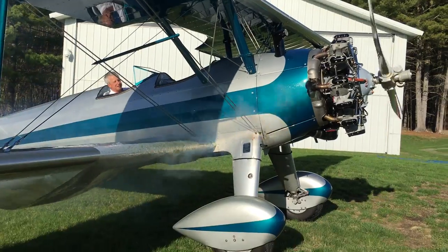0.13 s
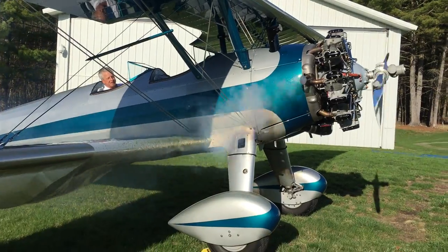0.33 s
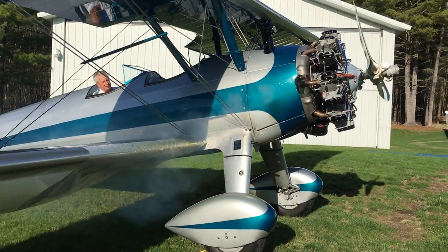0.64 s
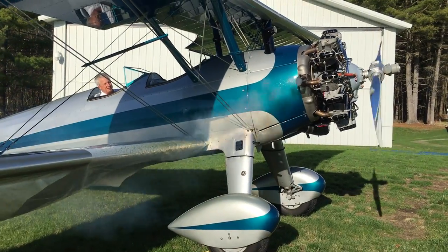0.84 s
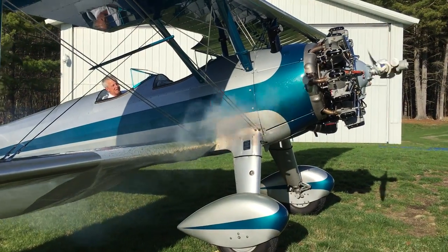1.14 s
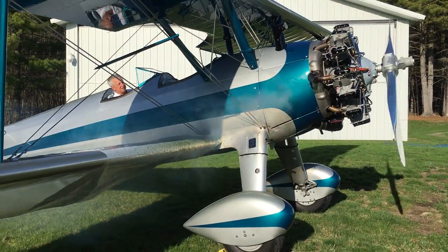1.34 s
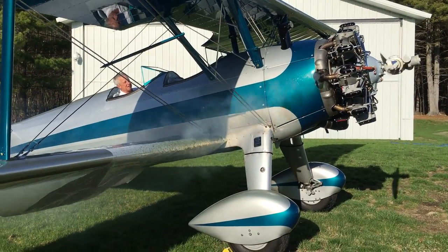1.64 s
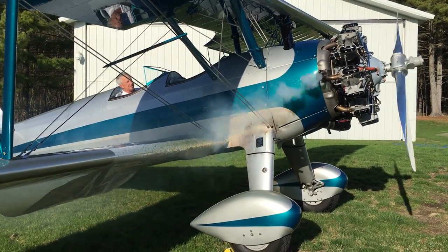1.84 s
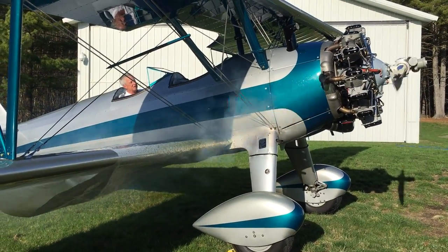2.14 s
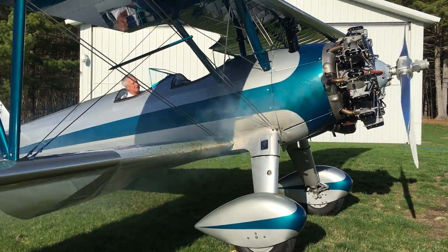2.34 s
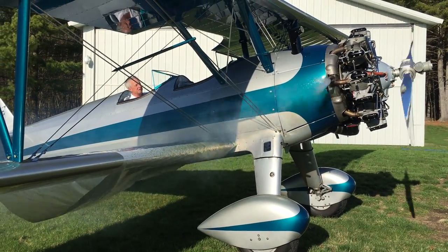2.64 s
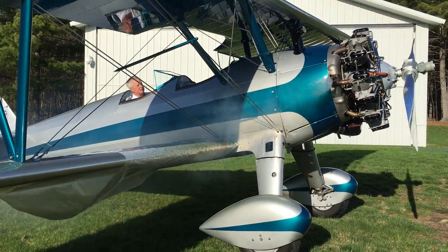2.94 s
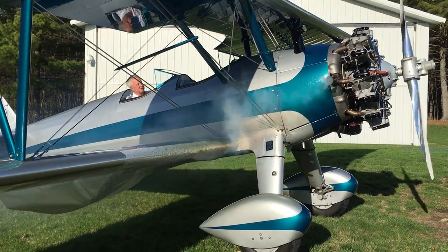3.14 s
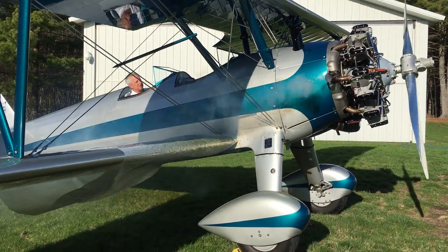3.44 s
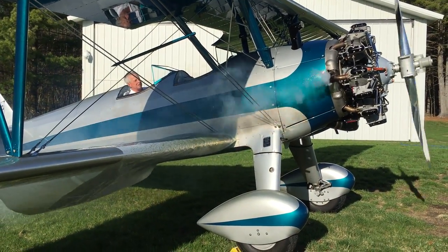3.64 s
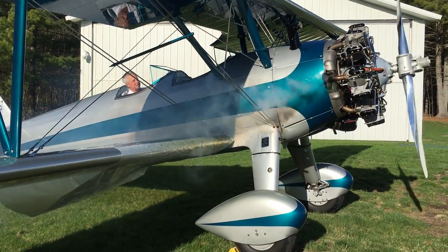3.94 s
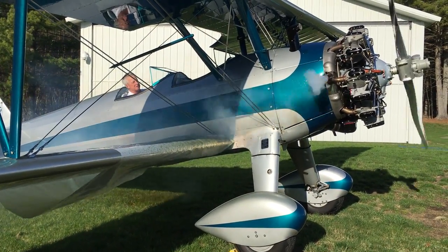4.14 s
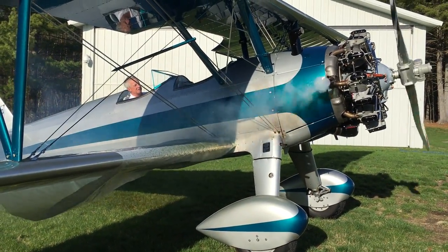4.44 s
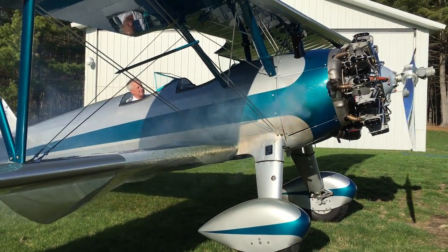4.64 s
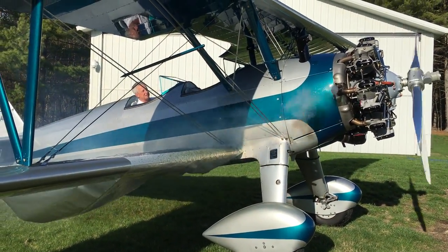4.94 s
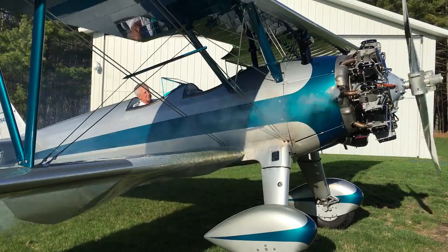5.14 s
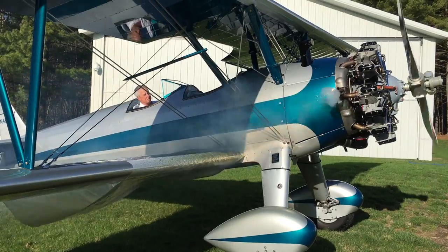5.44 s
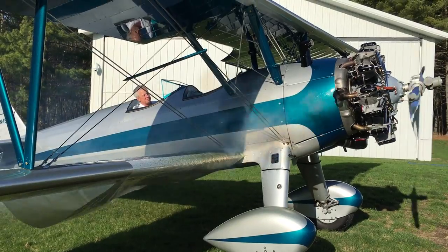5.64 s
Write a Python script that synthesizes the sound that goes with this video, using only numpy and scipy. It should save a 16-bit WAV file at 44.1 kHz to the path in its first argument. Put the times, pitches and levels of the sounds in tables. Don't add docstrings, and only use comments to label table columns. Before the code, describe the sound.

Close, dry outdoor sound of an old multi-cylinder aircraft engine at slow idle. Bursts of bright gas hiss ring briefly in pipe and cowl, backed by low knocks and thuds. The rhythm stumbles, with strong and weak firings and dead strokes, somewhat more regular later. A steady airy propeller wash and fine mechanical ticking fill the gaps, and faint dull echoes follow the loudest spits. The microphone stays put, a few metres off.

```python
import sys
import numpy as np
from scipy import signal
from scipy.fft import rfft, irfft
from scipy.io import wavfile
from scipy.ndimage import uniform_filter1d

SR = 44100
rng = np.random.default_rng(int(sys.argv[2]) if len(sys.argv) > 2 else 0)


def dump(signal):
    limited = np.clip(np.atleast_2d(signal).T, -1, 1)
    pcm = np.round(limited * 32767).astype(np.int16)
    wavfile.write(sys.argv[1], SR, pcm)


def volts_from_decibels(level):
    exponent = np.asarray(level, float) / 20
    return 10 ** exponent


N = 254898
STROKE_N = SR // 8

# frequency in Hz, level in dB per Hz.
WASH_SPECTRUM = [(30, -22), (100, -0.5), (135, -5), (165, -11.5), (195, -0.5), (306, -6), (465, -18),
                 (1500, -15), (3750, -23), (15500, -43.5)]

# engine cycles (two turns, seven strokes), and the moments they begin in seconds.
CYCLE_NUMBERS = [-1, 0, 2, 4, 6, 8, 10, 11, 12, 14, 15, 16, 17, 18, 20, 21, 22, 24]
CYCLE_START_S = [-0.219, 0.0255, 0.517, 1.0155, 1.51, 2.0085, 2.511, 2.7545, 2.9925, 3.4815, 3.731, 3.976,
                 4.2255, 4.466, 4.9325, 5.172, 5.404, 5.878]
VALVE_EARLY_S = [0, .0055, .001, .0015, .001, .0015, .001]
MISFIRE_CYCLES = [
    [2, 6, 16],
    [1, 3, 5, 8, 10, 12, 14, 20],
    [0, 2, 3, 5, 6, 8, 11, 13, 14, 16, 17, 19, 20, 22, 23],
    [],
    [],
    [1, 3, 7, 9, 11],
    [8, 20],
]

# jet, pipe, thump, knock and bark level, all in dB.
FIRED_LEVELS = [(-25.5, -22.5, -24, -21, -31), (-18, -22.5, -20, -16, -20), (-17.5, -19, -15, -23, -24),
                (-28.5, -24, -18, -27, -30), (-21, -20.5, -29, -17, -24.5), (-21.5, -19.5, -21, -18, -23),
                (-23, -21, -16.5, -21, -35)]
# jet, pipe, thump, knock and bark level, all in dB.
PUMPED_LEVELS = [(-37, -38, -40, -30, -33), (-51, -44, -18, -40, -28), (-53, -41, -32, -34, -35),
                 (-50, -42, -30, -40, -34), (-50, -42, -30, -40, -34), (-60, -45, -21, -38, -33),
                 (-53, -41, -24, -43, -36)]
# jet, pipe, thump, knock and bark in dB.
REBOUND_BOOST_DB = [1.5, 1.1, .6, .6, .6]
# time in seconds, jet change in dB, pipe change in dB.
RICH_AND_LEAN = [(.026, 5, .3), (.235, -3.5, -1.1), (.481, -3, -.6), (.549, 1.5, 4), (.871, 4, -2.1),
                 (.978, 4, 1.5), (1.4, 4.5, 3), (1.434, -.6, -6), (1.54, -2.5, -5), (1.898, -2.5, -5),
                 (2.258, -5.5, -5), (2.33, -9, -11), (2.58, -13, -12), (2.65, 2.1, -4.5), (3.097, 3, -6),
                 (3.587, -4, -4), (3.623, 4, 1.1), (4.007, -2.1, -4), (4.079, -6, -1.1), (4.254, -1.1, -5),
                 (4.533, 3, 3.5), (4.599, 1.5, -4), (4.699, -5, -.6), (4.796, -5, -2.5), (5.171, 3, .3),
                 (5.405, -7, .3), (5.501, -3, -1.1), (5.538, -5.5, -9), (5.57, -11, -7.5), (5.604, 4, 4)]
# time in seconds, thump change in dB.
THUMP_CHANGES = [(.026, -14), (.549, -7), (.871, -11), (1.017, 6), (1.364, -11), (1.54, -18), (1.789, 5),
                 (1.827, -5), (1.972, -6), (2.114, -8), (2.291, 5), (2.33, -5), (2.58, -10), (2.616, -18),
                 (2.754, 5), (2.784, 4), (3.097, -9), (3.202, -5), (3.237, 8), (3.267, -6), (3.34, 3),
                 (3.587, -9), (3.799, 3), (4.007, -18), (4.325, 4), (4.564, -9), (4.699, 11), (5.171, 8),
                 (5.405, 10), (5.641, 6)]
# time in seconds, knock change in dB, bark change in dB.
KNOCK_BARK_CHANGES = [(.235, -7, 1.5), (.906, 1.1, -6), (.978, 4, 1.5), (1.083, -5, -2.1),
                      (1.189, -9, -1.1), (1.434, 5, -6), (1.54, 1.1, -4), (1.688, 4.5, 2.5),
                      (1.789, -5, .3), (1.827, 4, 6.5), (1.864, 9, 3), (1.898, -15, -15), (1.972, 5, -4),
                      (2.258, -15, -6), (2.291, -8, 4), (2.33, -15, -2.1), (2.366, 9, 1.1), (2.473, 5, 5),
                      (2.58, -6, -16), (2.888, 1.1, 6), (3.13, 3.5, 3), (3.164, -18, .3), (5.741, .3, -9),
                      (3.409, -18, -6), (3.903, 4.5, 1.1), (4.533, 9, -1.1), (4.665, 7, -2.1),
                      (4.727, -14, .3), (5.538, -18, -5), (5.57, -15, -10)]

# thump delay in seconds, knock delay in seconds, knock in Hz,
# bark delay in seconds, bark in Hz, jet swell in seconds.
CYLINDER_LAYOUT = [(0.0436, -0.0025, 99, .004, 298.4, 0.003), (0.0333, .0231, 106.5, -.003, 301.3, 0.0029),
                   (0.0134, -0.0045, 78.7, -0.0034, 280, .0027), (-0.007, -0.00003, 91, .004, 273, 0.0031),
                   (-0.0225, 0.0186, 96.7, -0.00017, 286.5, 0.0034),
                   (0.024, 0.0089, 99.4, -.005, 324, 0.0029), (-0.0065, 0.0011, 85, .004, 270, 0.0026)]
# frequency in Hz, level in dB per Hz.
JET_SPECTRUM = [(1760, -29), (3000, -12.5), (3800, -4.5), (4910, -7), (6890, -4.5), (9540, -7.5),
                (10400, -11), (14400, -8.5), (15700, -7.5)]
LATE_OUTFLOW = [0.59, 0.28, 0.077, 0.6, 0.25, 0.26, 0.75]
# frequency in Hz, width in Hz, level in dB.
PIPE_MODES = [(698, 30, -9.5), (856, 58, -3.5), (985, 48, -5.5), (1177, 100, -4), (1482, 37, -1.6),
              (1874, 158, 2), (1922, 71, 1), (2156, 68, 0), (2442, 66, -4.5), (3270, 145, -4),
              (3716, 190, 3), (4280, 210, -2.5)]
# jet edge in dB, hoot in dB, then pipe level in dB
CYLINDER_COLOURS = [(-4.5, -9, 0.76, 2.9, -0.7, 0.91), (0, -8, 0.42, 2, 6.5, -1.2),
                    (0.7, -8.5, 0.35, 2.5, 3, 2.7), (-3, -8.5, .1, 3.2, -2.8, 0.25),
                    (-0.5, -10.5, -0.25, -2.2, 3, 1.5), (5.5, -8.5, -1.7, 3, 3, -2),
                    (-5.5, -0.7, 1.8, 2.5, 0.5, -2.4)]
COLOUR_HZ = [930, 1490, 1900, 2250, 3000]


def evened(x):
    return x / np.sqrt(np.mean(x ** 2) + 1e-20)


def coloured(x, points):
    point_hz, point_db = np.transpose(points)
    hz = np.fft.rfftfreq(N, 1 / SR)
    gain_db = np.interp(np.log(hz + 1), np.log(point_hz), point_db)
    return irfft(rfft(x) * volts_from_decibels(gain_db), N)


def bandpassed(x, low_hz, high_hz):
    return signal.sosfilt(signal.butter(2, [low_hz, high_hz], "band", fs=SR, output="sos"), x)


def resonate(x, hz, width_hz):
    carrier = np.exp(2j * np.pi * hz * np.arange(N) / SR)
    decay = np.exp(-np.pi * width_hz / SR)
    smoothed = signal.lfilter([1 - decay], [1, -decay], x / carrier)
    return 2 * (carrier * smoothed).real


def wash():
    rumble_spectrum = [(22, -40), (38, 6), (50, -5.5), (75, -8), (110, -1.0), (145, -5.5), (162, -20), (400, -67)]
    air = evened(coloured(rng.standard_normal(N), WASH_SPECTRUM))
    rumble = evened(coloured(rng.standard_normal(N), rumble_spectrum))
    return volts_from_decibels(-31.5) * air + volts_from_decibels(-28.5) * rumble


def clatter():
    taps_per_s = 150
    strength_db = 5.7 * np.minimum(rng.exponential(1, N), 4)
    taps = volts_from_decibels(strength_db) * (rng.random(N) < taps_per_s / SR)
    heads = sum(resonate(taps, hz, 210) for hz in (1300, 2300, 3900))
    return volts_from_decibels(-45.5) * evened(heads)


def strokes():
    cycle, cylinder = np.divmod(np.arange(-1, 166), len(FIRED_LEVELS))
    even_s = np.interp(cycle + cylinder / len(FIRED_LEVELS), CYCLE_NUMBERS, CYCLE_START_S)
    return even_s - np.take(VALVE_EARLY_S, cylinder), cylinder, cycle


def strengths():
    stroke_s, cylinder, cycle = strokes()
    dead = np.array([c in MISFIRE_CYCLES[k] for k, c in zip(cylinder, cycle)])
    after_dead = np.roll(dead, 1)
    fired_db = np.take(FIRED_LEVELS, cylinder, axis=0) + np.outer(after_dead, REBOUND_BOOST_DB)
    for layers, table in (([0, 1], RICH_AND_LEAN), ([2], THUMP_CHANGES), ([3, 4], KNOCK_BARK_CHANGES)):
        for at_s, *change_db in table:
            nearest = np.argmin(abs(stroke_s - at_s))
            fired_db[nearest, layers] += change_db
    pumped_db = np.take(PUMPED_LEVELS, cylinder, axis=0)
    return np.where(dead[:, None], pumped_db, fired_db).T


def swell(rise_s, sharp=1):
    u = np.arange(STROKE_N) / SR / np.reshape(rise_s, (-1, 1))
    return (u * np.exp(1 - u)) ** sharp


def played(db, delay_s, shapes):
    out = np.zeros(N + SR)
    lead = SR // 10
    starts = np.round((strokes()[0] + delay_s) * SR).astype(int) + lead
    shapes = np.broadcast_to(shapes, (len(starts), shapes.shape[1]))
    for at, gain, shape in zip(starts, volts_from_decibels(db), shapes):
        out[at:at + len(shape)] += gain * shape
    return out[lead:lead + N]


def turbulence(lumps, puffs):
    eddies = evened(uniform_filter1d(rng.standard_normal(N), size=40))
    gusts = evened(uniform_filter1d(uniform_filter1d(rng.standard_normal(N), size=150), size=150))
    return evened(rng.standard_normal(N) * np.exp(lumps * eddies + puffs * gusts))


def jet(db, rise_s, edge_db, late):
    # low edge in Hz, high edge in Hz, slowness of the swell, share of the jet edge level.
    bands = [(1480, 6230, 3.1, 0.078), (5300, 10500, 2.57, 0.63), (9500, 14700, 1.99, 1.27)]
    chance_db = 1.1 * rng.standard_normal((len(db), 3))
    total = 0
    for k, (low_hz, high_hz, slow, tilt) in enumerate(bands):
        hiss = bandpassed(evened(coloured(turbulence(0.23, 0.34), JET_SPECTRUM)), low_hz, high_hz)
        spit = 0.3 * swell(0.0027)
        surge = swell(slow * rise_s, 2.31)
        outflow = late[:, None] * swell(1.79 * slow * rise_s, 4.03)
        band_db = db + 3.0 + tilt * edge_db + chance_db[:, k]
        total = total + hiss * played(band_db, -0.001, spit + surge + outflow)
    return total


def note(db, delay_s, hz, rise_s, glide):
    detune, start, heat = rng.standard_normal((len(db), 3)).T[:, :, None]
    t = np.arange(STROKE_N) / SR
    stroke_hz = np.reshape(hz, (-1, 1)) * (1 + 0.021 * detune)
    turns = stroke_hz * (t + glide * (1 + heat) * t ** 2) + start
    return played(db, delay_s, swell(rise_s, 1.62) * np.sin(2 * np.pi * turns))


def pipe(db, colour_db, hoot_db):
    flow = turbulence(0.24, 0.17)
    shape = swell(0.009, 1.22)
    chance_db = 2.3 * rng.standard_normal((len(db), len(PIPE_MODES)))
    ring = 0
    for k, (hz, width_hz, mode_db) in enumerate(PIPE_MODES):
        own_db = np.array([np.interp(hz, COLOUR_HZ, [*c, 0]) for c in colour_db])
        drive = flow * played(db + mode_db + own_db + chance_db[:, k], 0.00033, shape)
        ring = ring + (-1) ** k * resonate(drive, hz, width_hz) * np.sqrt(1000 / width_hz)
    rough = bandpassed(flow * played(db, 0.0011, shape), 650, 2600)
    hoot = note(db + hoot_db, -0.00323, 596.6, 0.0084, 0)
    return volts_from_decibels(2.5) * ring + volts_from_decibels(-0.5) * rough + volts_from_decibels(-3.0) * hoot


def bark(db, delay_s, hz):
    drive = rng.standard_normal(N) * played(db, delay_s, swell(0.0071))
    below = resonate(resonate(drive, 194, 57), 196, 78)
    above = resonate(resonate(drive, 406, 54), 424, 68)
    tone = note(db + 1.0, delay_s - 0.005, hz, 0.011, 1)
    return tone + volts_from_decibels(17) * below + volts_from_decibels(8.5) * above


def push(db, delay_s, hz, rise_s):
    swing = np.sin(2 * np.pi * np.outer(hz, np.arange(STROKE_N) / SR))
    return played(db, delay_s, swell(rise_s) * swing)


def yard(x):
    fade_s = 0.12
    at = np.arange(600, SR // 2, 20)
    taps = np.zeros(SR // 2 + 20)
    signs = rng.choice([-1., 1.], len(at))
    taps[at + rng.integers(0, 20, len(at))] = signs * volts_from_decibels(-60 * at / SR / fade_s)
    echo = signal.fftconvolve(x, taps / np.linalg.norm(taps))[:N]
    return signal.sosfilt(signal.butter(1, 5000, fs=SR, output="sos"), echo)


def scene():
    cylinder = strokes()[1]
    jet_db, pipe_db, thump_db, knock_db, bark_db = strengths()
    thump_s, knock_s, knock_hz, bark_s, bark_hz, rise_s = np.transpose(CYLINDER_LAYOUT)[:, cylinder]
    edge_db, hoot_db, *colour_db = np.transpose(CYLINDER_COLOURS)[:, cylinder]
    gas = clatter() + jet(jet_db, rise_s, edge_db, np.take(LATE_OUTFLOW, cylinder))
    gas = gas + pipe(pipe_db, np.transpose(colour_db), hoot_db)
    barks = bark(bark_db, bark_s, bark_hz)
    thump = push(thump_db, thump_s, 46, 0.012)
    knock = push(knock_db, knock_s, knock_hz, 0.01)
    low_cut = signal.butter(3, 31, "high", fs=SR, output="sos")
    low = signal.sosfiltfilt(low_cut, thump + knock)
    return (wash() + gas + barks + low + volts_from_decibels(-14) * yard(gas))[None]


def top_cut(x):
    return signal.sosfilt(signal.butter(12, 16480, fs=SR, output="sos"), x)


def record(dry):
    limited = 0.96 * np.tanh(dry / 0.94)
    edge = signal.firwin(255, 15830, window=("kaiser", 6), fs=SR)
    mix = signal.oaconvolve(limited, edge[None], "same")
    return top_cut(mix)


dry = scene()
out = record(dry)
dump(out)
```